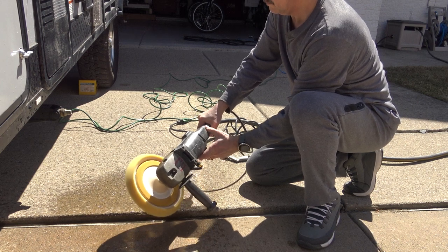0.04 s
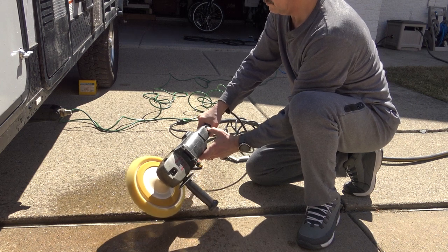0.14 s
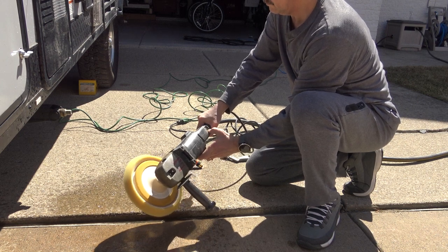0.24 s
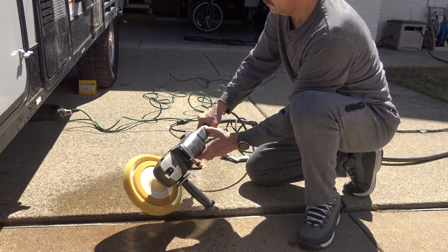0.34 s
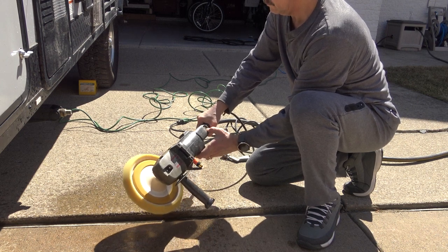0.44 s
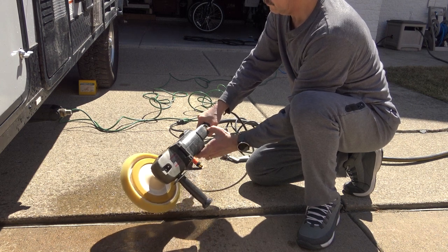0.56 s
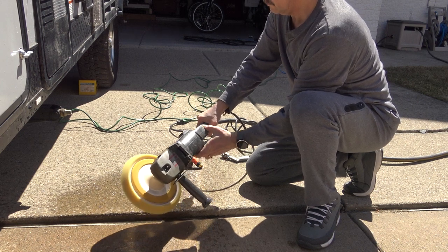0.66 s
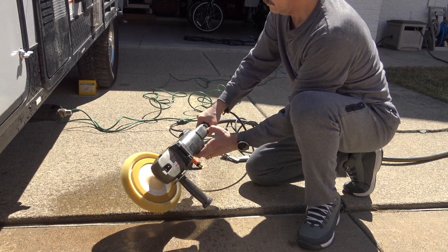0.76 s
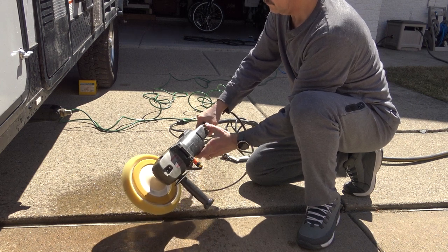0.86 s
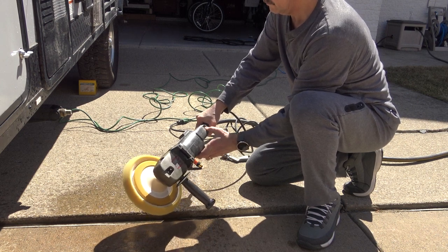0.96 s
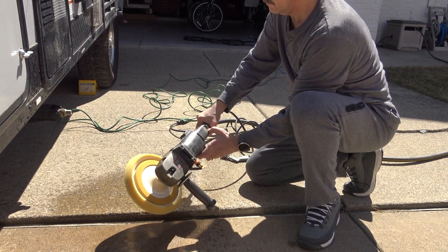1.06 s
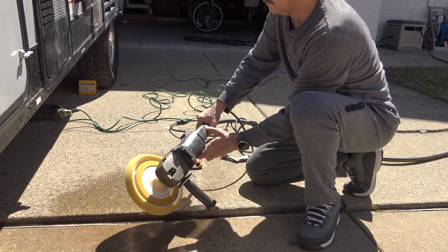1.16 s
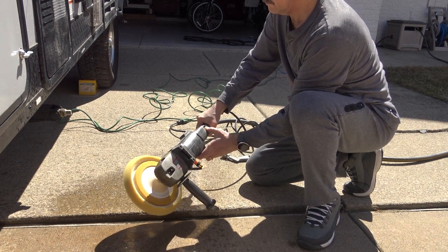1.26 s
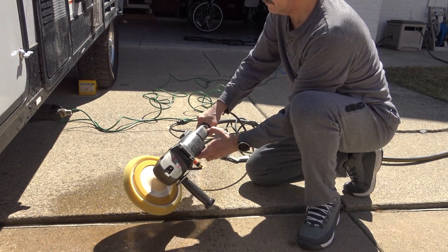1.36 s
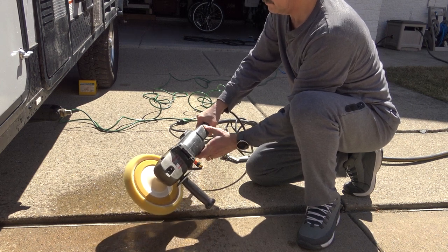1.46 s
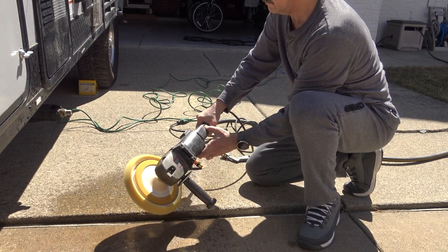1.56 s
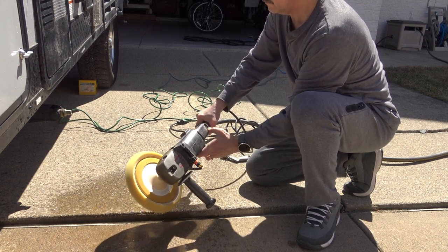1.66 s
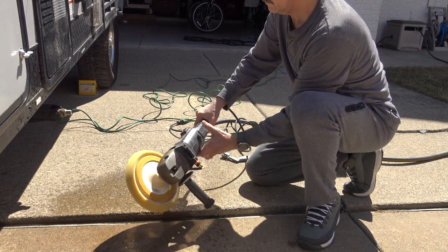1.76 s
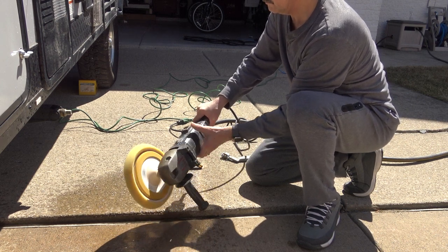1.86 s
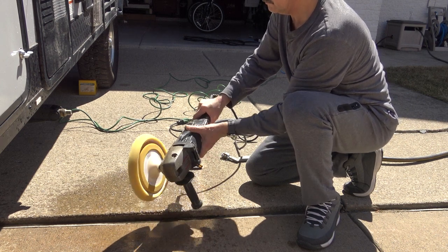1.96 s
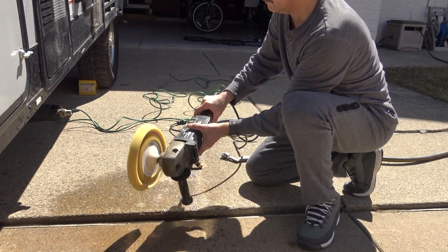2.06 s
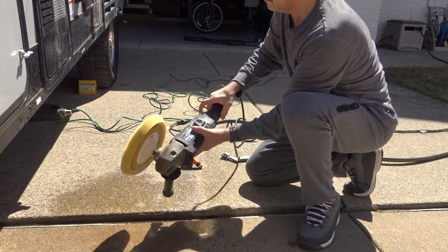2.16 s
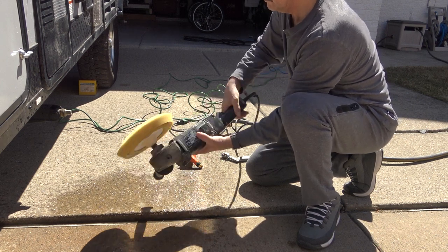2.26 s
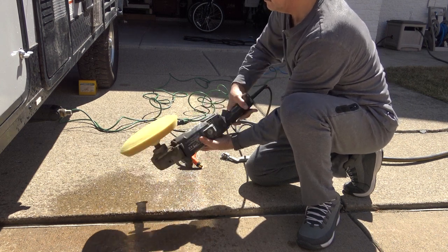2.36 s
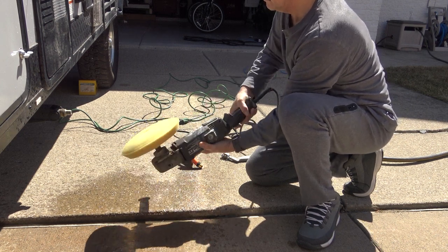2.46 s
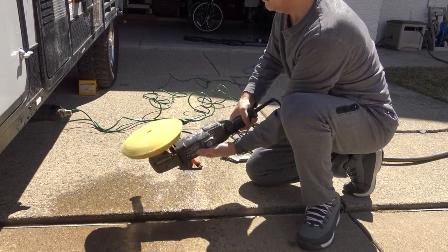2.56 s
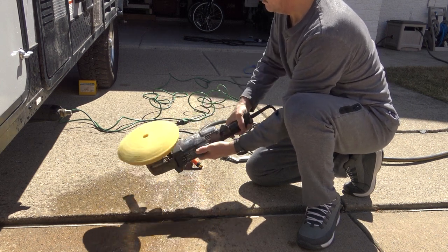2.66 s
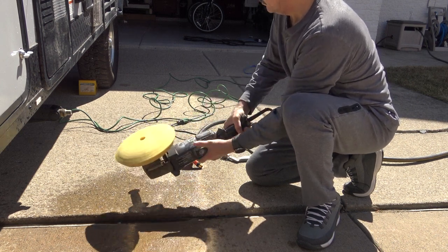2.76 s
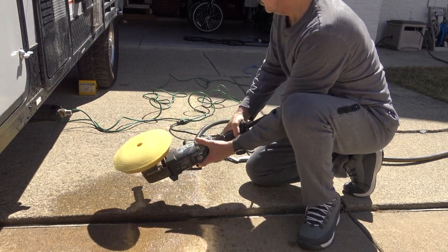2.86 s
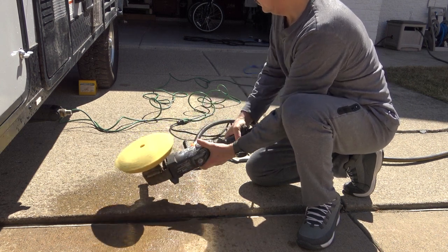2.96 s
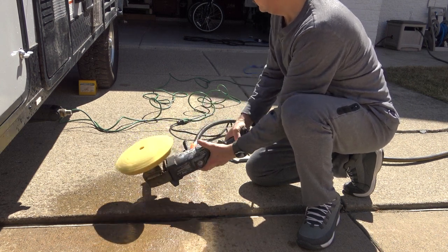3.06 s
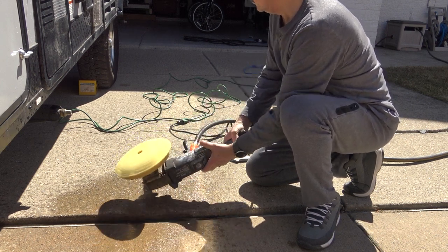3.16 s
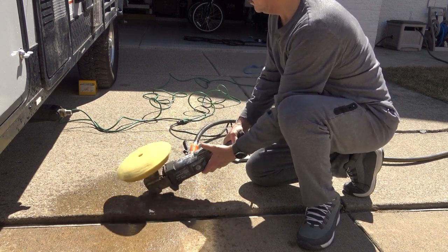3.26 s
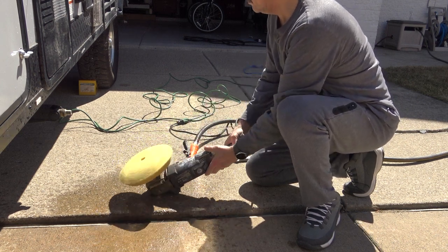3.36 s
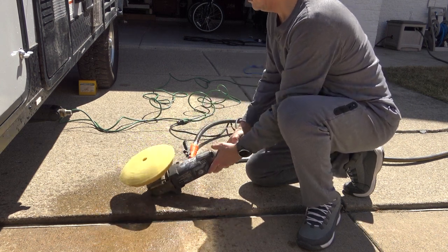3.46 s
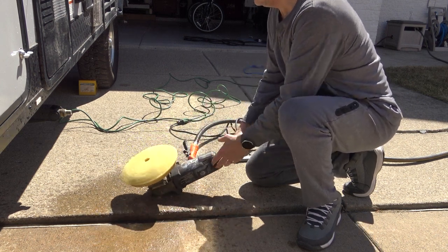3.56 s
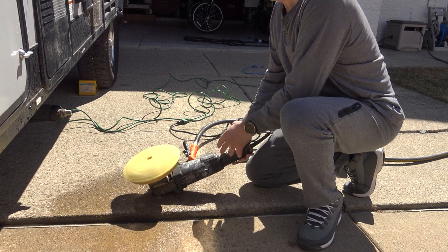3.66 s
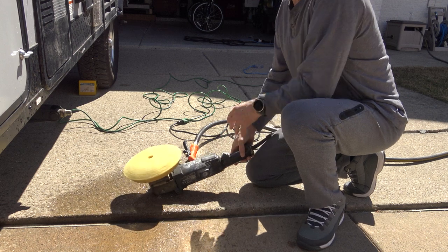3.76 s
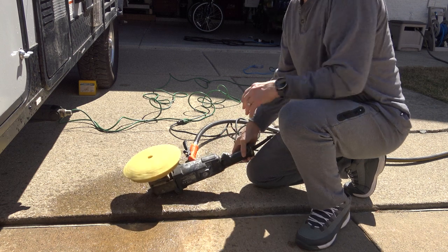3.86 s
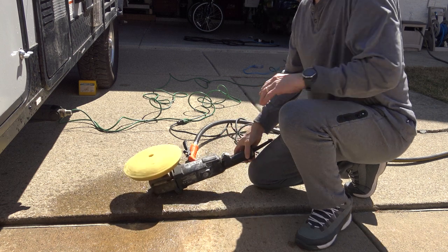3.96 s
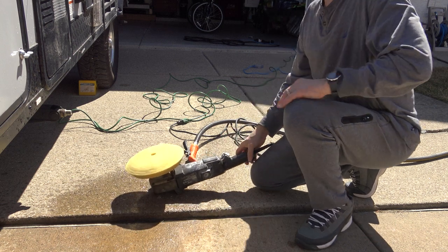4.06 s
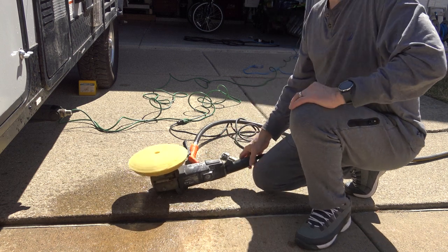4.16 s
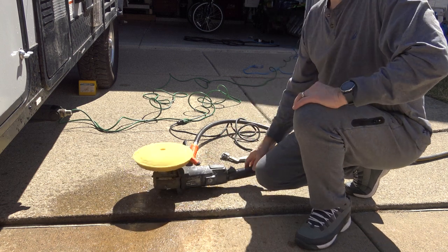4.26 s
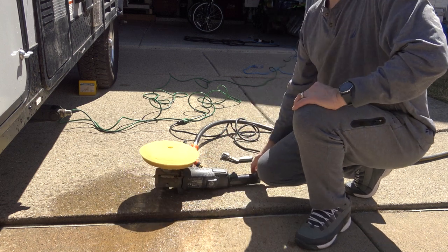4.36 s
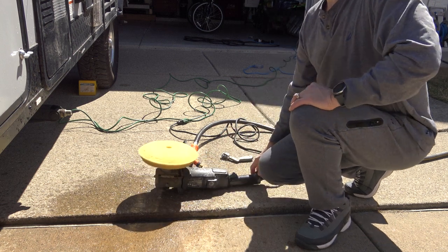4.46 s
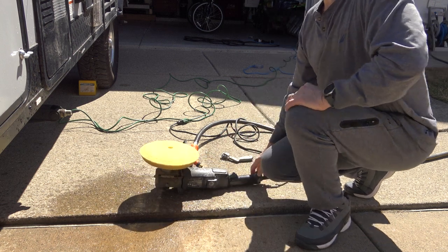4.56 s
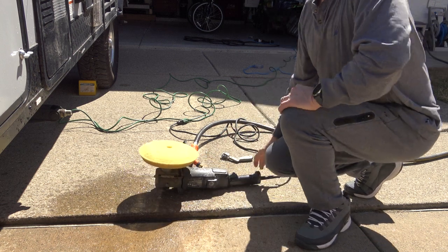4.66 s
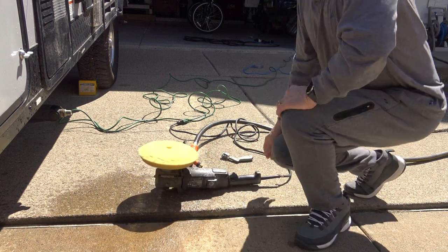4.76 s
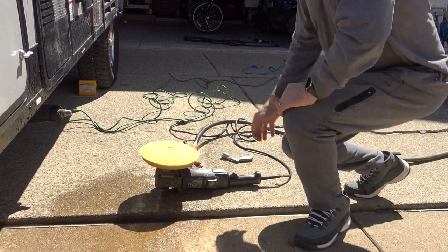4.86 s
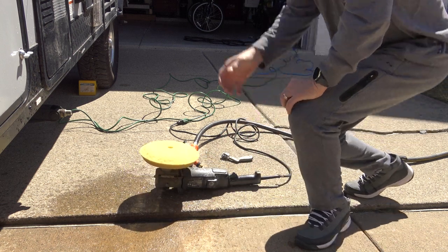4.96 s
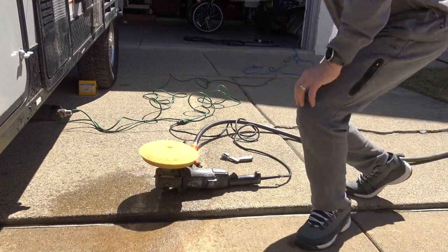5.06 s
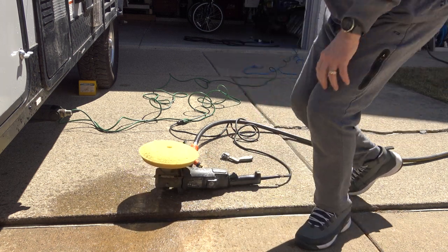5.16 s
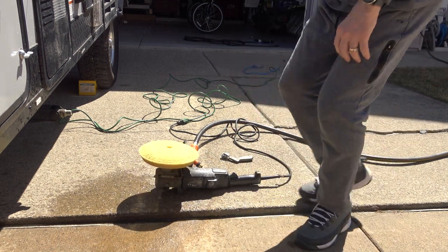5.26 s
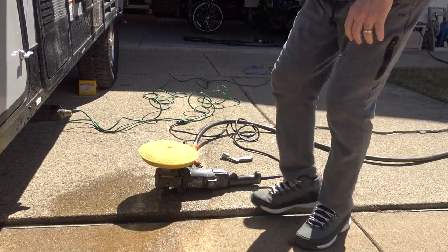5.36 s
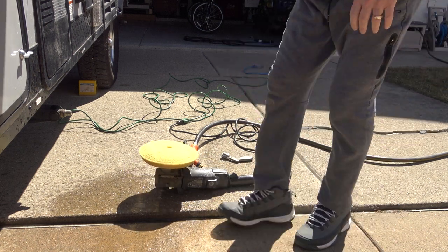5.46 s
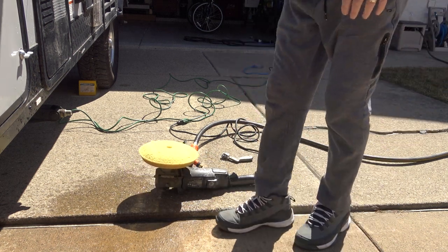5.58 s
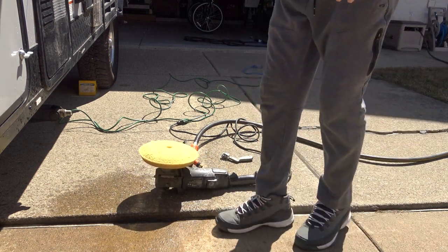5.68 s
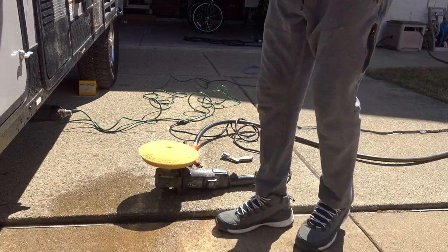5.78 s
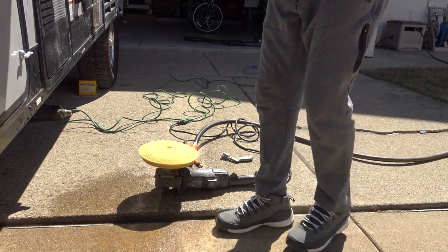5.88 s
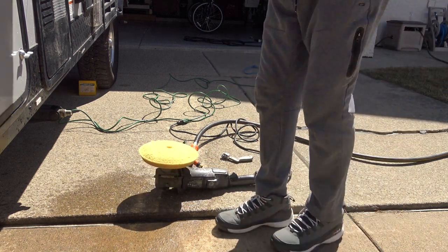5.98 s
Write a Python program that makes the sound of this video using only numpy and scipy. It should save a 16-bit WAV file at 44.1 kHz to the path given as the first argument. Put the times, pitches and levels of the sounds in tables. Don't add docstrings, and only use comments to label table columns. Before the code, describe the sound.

Outdoors on concrete, with a close stereo microphone, a rotary polisher is already spinning at full speed: a piercing, slightly fluttering whine near 4.6 kHz with higher overtones, rushing cooling air and quick gear knocks. At about 0.5 s it is switched off and the whine slides smoothly down, near 2.4 kHz by 2 s, while brush hiss shows through. From 1.2 s the knocks grow uneven, bright and metallic, about twenty to thirty a second with small pings, as the tool is turned over. Around 3.2-3.9 s it rattles, touching the concrete with a dull thud at 3.45 s as wind buffets softly. From 4 to 4.5 s the body chatters lower and woodier; sparse tooth clicks follow until 5.2 s as whirr and air die out. Quiet distant murmur and low wind remain. At 5.56 s a firm shoe thud lands, with gritty scuffs and lighter steps at 5.8 and 5.9 s.

```python
import sys
import numpy as np
from scipy import signal
from scipy.fft import rfft, irfft
from scipy.io import wavfile

SR = 44100
rng = np.random.default_rng(int(sys.argv[2]) if len(sys.argv) > 2 else 0)


def log_audio(samples):
    frames = np.atleast_2d(samples).T
    limited = np.clip(frames, -1, 1)
    pcm = np.round(limited * 32767).astype(np.int16)
    wavfile.write(sys.argv[1], SR, pcm)


def gain_from_db(level_db):
    decades = np.asarray(level_db, float) / 20
    return 10 ** decades


N = 265482
TIME = np.arange(N) / SR

# pitch_hz, level_db (per Hz)
YARD_SPECTRUM = [(100, -25.5), (200, -11.5), (500, -6.5), (900, -10), (1600, -18), (3000, -27),
                 (8000, -31.5), (15900, -38.5)]
# pitch_hz, level_db (per Hz)
WIND_SPECTRUM = [(15, -15.5), (40, -3.5), (110, -1.5), (200, -9), (400, -32), (900, -70)]
# peak_s, level_db, length_s
GUSTS = [(.65, -63, 0.18), (2.06, -44.5, 0.27), (2.622, -49, 0.18), (2.966, -48.5, 0.2),
         (3.436, -40.5, 0.21), (3.567, -33, 0.093), (3.78, -49, 0.079), (3.248, -50.5, 0.084),
         (3.91, -37.5, 0.12), (4.153, -40, 0.098), (4.276, -41, 0.18), (5.325, -44.5, 0.057)]
# start_s, peak_db, first_thud_hz, second_thud_hz, t60_s
SOLE_THUDS = [
    (5.559, -14, 284, 570, 0.03),
    (5.818, -21.5, 223, 525, 0.056),
    (5.93, -23.5, 274, 477, 0.06),
]
# start_s, peak_db, first_thud_hz, second_thud_hz, t60_s
SET_DOWN = [
    (3.452, -14.5, 318, 610, 0.017),
]
# start_s, peak_db, length_s
GRIT_SCUFFS = [(5.56, -36, 0.0053), (5.582, -36.5, 0.0089), (5.602, -44, 0.0057), (5.759, -37, 0.0052),
               (5.798, -32, 0.0074), (5.817, -25, 0.0057), (5.842, -36, 0.0058), (5.87, -37, 0.0063),
               (5.9, -27.5, 0.0073), (5.9244, -28.5, 0.0038)]
# peak_s, level_db, length_s, pitch_hz
SOLE_DRAGS = [
    (5.62, -52, 0.051, 2300),
    (5.873, -53, 0.0149, 2494),
]
# pitch_hz, level_db (per Hz)
AIR_SPECTRUM = [(88, -78), (150, -25.5), (375, -10), (920, -5), (1160, 0), (1360, -6.5), (2350, 4),
                (2970, -3), (7420, -3), (13900, -20), (15900, -28.5)]
# pitch_hz, level_db (per Hz)
HISS_SPECTRUM = [(120, -56.5), (200, -14.5), (682, -5), (1200, -3.5), (1770, -8.5), (2950, -10),
                 (9500, -19), (15900, -33)]
# pitch_hz, width_hz, level_db
CASING = [(660, 110, 3.0), (1450, 120, 7.0), (1750, 150, 6.0), (2450, 150, 6.0), (3950, 150, 2.0),
          (5100, 250, 3.0), (6400, 350, 3.0), (8900, 500, 4.0)]
# start_s, level_db, pitch_hz
GUARD_PINGS = [(1.854, -17, 8600), (1.926, -17, 7800), (2.216, -13.5, 5500), (5.825, -36, 5300),
               (5.828, -31, 1280), (2.725, -30, 7750), (2.725, -24, 8500), (2.822, -34, 7200),
               (2.857, -22, 7800), (2.934, -31, 7500), (2.998, -24.5, 7550), (3.073, -25, 8000),
               (3.149, -20.5, 5100), (3.149, -25, 8200), (3.191, -22.5, 5000), (3.289, -20.5, 7900),
               (3.434, -17.5, 8300), (3.434, -14, 5100), (3.593, -24.5, 5000), (4.06, -28.5, 7800),
               (4.092, -24.5, 7500), (4.13, -25.5, 7400), (4.178, -35, 7600), (4.214, -36.5, 7700),
               (4.322, -33.5, 8200), (4.416, -29.5, 8700)]
# start_s, level_db, pitch_hz
CLANKS = [(2.505, -16, 3190), (2.575, -14, 2300), (2.75, -19, 3300), (2.8, -17, 2600), (2.823, -14, 2600),
          (2.822, -20, 3280), (2.857, -27, 2700), (2.882, -17.5, 2600), (2.951, -23, 2730),
          (2.998, -16, 3110), (3.02, -15, 2300), (3.02, -18, 3810), (3.073, -18, 2930), (3.094, -25, 2980),
          (3.094, -19, 3800), (3.149, -15, 3220), (3.149, -18, 3890), (3.191, -18, 3370),
          (3.289, -16, 3320), (3.289, -22, 3880), (3.485, -24, 3200), (3.537, -18, 2798),
          (4.016, -11, 1770), (4.08, -16, 2670), (4.13, -20, 1860), (4.214, -15, 2670), (4.214, -21, 1850),
          (4.322, -23, 2700), (4.366, -20, 2700), (4.718, -25, 1047), (4.953, -29, 1053),
          (2.455, -16, 3900), (5.932, -39, 1300)]
# pitch_hz, level_db, t60_s
HOUSING = [(404, -14, 0.14), (660, -3.5, 0.031), (854, 5.5, 0.011), (1027, -10.5, 0.12),
           (1332, -1.5, 0.036), (1667, -10.5, 0.064), (1860, 7.5, 0.013), (2300, 0.5, 0.012),
           (2630, -1.5, 0.06), (2910, -1, 0.0096), (3224, -7.5, 0.049), (3800, -6, 0.017),
           (5130, -5, 0.013), (7150, -8.5, 0.0108)]
# time_s, level_db, place (0-1 turn), swing early/late (0-1 turn)
HIGH_SPOT = [(0.0, -10, 0.89, 0), (.55, -12, 0.72, 0.05), (.9, -14, 0.74, 0), (1.15, -15.5, 0.63, 0.03),
             (1.4, -11, 0.74, 0.08), (1.75, -14.5, 0.73, 0)]
# start_s, level_db, loudest_ring_hz
UNSEATING = [(1.203, -14, 1800), (1.235, -16.5, 1650), (1.274, -16.5, 1600), (1.291, -8, 1912),
             (1.301, -9.5, 2340), (1.340, -8, 1860), (1.360, -15, 2590), (1.373, -7.5, 2610),
             (1.391, -19, 2100), (1.414, -13, 1440), (1.431, -14, 1980), (1.447, -14.5, 1356),
             (1.492, -15.5, 1460), (1.509, -11.5, 2490), (1.524, -14, 1400)]
# start_s, level_db, loudest_ring_hz
SLIPPING = [(1.567, -7.5, 1927), (1.602, -8, 2627), (1.645, -8, 2600), (1.684, -3.5, 2582),
            (1.734, -4.5, 2600), (1.766, -5.5, 2600), (1.817, -9.5, 2500), (1.854, -7, 2425),
            (1.903, -6, 2430), (1.942, -9, 2440), (1.992, -7.5, 2480), (2.040, -8, 2320), (2.087, -6, 2600),
            (2.135, -8, 2223), (2.188, -6.5, 2195), (2.232, -5, 2130), (2.290, -8, 2600), (2.338, -5, 2050),
            (2.395, -9, 2980), (2.455, -7.5, 3020), (2.505, -11, 3047), (2.575, -9, 3200),
            (2.628, -11, 3230), (2.706, -13.5, 2600), (2.769, -13.5, 2707), (2.822, -10.5, 1728),
            (2.882, -7, 1700), (2.950, -8, 1650), (3.020, -11, 1589), (3.094, -9.5, 1600),
            (3.171, -10, 3425)]
# start_s, level_db, loudest_ring_hz
REBOUNDS = [(1.585, -10, 2624), (1.632, -12.5, 1884), (2.073, -11.5, 2447), (2.411, -11, 3198),
            (2.555, -19.5, 902), (2.8, -19.5, 1830), (2.856, -17.5, 3116), (1.667, -13, 2588),
            (1.751, -9.5, 2600), (1.84, -6.5, 2392), (1.877, -12, 2400), (1.926, -9, 2588),
            (2.013, -13.5, 2498), (2.216, -13.5, 3224), (2.27, -11, 3183), (2.433, -16, 3996),
            (2.485, -6, 1821), (2.532, -17, 3190), (2.723, -12, 1680), (2.749, -11, 2610),
            (2.933, -15.5, 3180), (2.998, -11.5, 1505), (3.073, -17.5, 636), (3.149, -11, 1861),
            (3.191, -15, 3074)]
# start_s, level_db, loudest_ring_hz
RATTLE = [(3.247, -16, 3410), (3.265, -13.5, 3360), (3.289, -10.5, 1817), (3.341, -13, 1739),
          (3.404, -10.5, 2470), (3.424, -6, 2720), (3.434, -7, 2900), (3.459, -8.5, 724),
          (3.484, -11.5, 2685), (3.537, -11.5, 2272), (3.572, -15.5, 960), (3.593, -13.5, 2245),
          (3.62, -14.5, 978), (3.674, -13.5, 2650), (3.717, -15.5, 1076), (3.736, -11, 2661),
          (3.805, -14.5, 890), (3.822, -6.5, 955), (3.833, -8.5, 1830), (3.863, -13.5, 966),
          (3.89, -8.5, 966), (3.916, -25.5, 963)]
# start_s, level_db, loudest_ring_hz
CHATTER = [(4.016, -9.5, 888.4), (4.04, -14, 931), (4.06, -11, 854), (4.08, -11, 920), (4.092, -10, 865),
           (4.113, -12, 952), (4.13, -10.5, 763), (4.158, -12.5, 1127), (4.178, -9, 1795),
           (4.201, -14, 787), (4.214, -14.5, 797), (4.24, -11, 989), (4.257, -15, 701), (4.292, -17, 982),
           (4.322, -10.5, 1845), (4.348, -9.5, 979), (4.368, -16, 1837), (4.416, -7.5, 1924),
           (4.437, -14, 1515), (4.388, -16.5, 1002), (4.467, -14.5, 606), (4.501, -16, 1702),
           (4.539, -17.5, 1745)]
# start_s, level_db, loudest_ring_hz
LAST_TEETH = [(4.669, -19.5, 1798), (4.718, -19.5, 1797), (4.732, -18, 1856), (4.771, -20.5, 1794),
              (4.833, -19.5, 704), (4.909, -20.5, 641.7), (4.987, -20, 653.2), (5.034, -22, 660),
              (5.072, -17, 653), (5.124, -32, 1530), (5.18, -29.5, 660), (5.212, -35.5, 1227)]
# time_s, blade_rate_hz
ROTOR = [(0.0, 4633), (0.12, 4652), (0.31, 4653), (0.48, 4579), (0.55, 4447), (0.74, 4041), (1.02, 3542),
         (1.25, 3200), (1.59, 2771), (1.99, 2363), (2.34, 2051), (2.61, 1817), (3.1, 1443), (3.45, 1208),
         (3.78, 992), (4.13, 772), (4.45, 571), (5.1, 192)]
ORDERS = (1 / 12, 1 / 6, 1, 2, 2.5, 3, 3.5)
# full_speed_db, loss_db (per octave slower), whirl_db (gain at critical speed)
ORDER_LEVELS = [(-47.5, -3, .1), (-39.5, 5, .1), (-30, 4, -4.5), (-27.5, 10, -3.5), (-51.5, 0.7, 9),
                (-45.5, -1.5, -12.5), (-62, -1.8, 0.5)]
WEAK_ORDERS = (1.5, 4, 5, 6, 8)
# full_speed_db, gain_db (per octave slower)
WEAK_LEVELS = [(-4, -7), (-17.5, 3), (-25, 5), (-30.5, 5.5), (-20.5, 6)]
# pitch_hz, width_hz, upright_db, turned_over_db
SHROUD = [(696, 150, 0, 9), (1628, 180, -8, 16), (2075, 120, -1.5, 7.5), (2290, 94, 1.5, 5),
          (2480, 90, -14, 7), (2984, 26, -7.5, 7), (3487, 246, 10, 5), (3960, 210, 3.5, 12),
          (4560, 140, 8.5, 9.5), (5530, 390, 6, 13.5), (6140, 360, 2, 11.5), (7200, 780, 10, 13.5),
          (7900, 360, -4, -2), (9400, 1040, 9, 8)]
# order, peak_s, length_s, level_db
BEAMS = [(1, 2.241, 0.13, 4.5), (1, 1.7, 0.2, -15.5), (1, 3.528, 0.18, 6), (1, 4.684, 0.22, -4.5),
         (1, 0.31, 0.088, 1), (4, 3.1, 0.1, -1), (8, 3.2, 0.19, 3), (8, 2.1, .2, 7), (6, 1.6, .15, 7),
         (1.5, 1.2, 0.17, -0.5), (1.5, 4.9, .1, -7), (1.5, 4.9, 0.091, 6), (1.5, 3.75, 0.38, -20),
         (2, 0.39, 0.35, -3), (2, 0.8, 0.17, 5.5), (2, 1.95, 0.16, -1), (2, 2.44, 0.082, -5),
         (2, 3.2, 0.088, -3), (2, 3.72, 0.11, 8.5), (2, 4.256, 0.12, 14), (2, 4.4, 0.078, 14),
         (2, 2.086, 0.13, -7), (3, 3.76, 0.0525, 8.5), (3, 2.404, 0.068, 5), (2.5, 2, 0.2, 0),
         (2.5, 3.367, 0.14, -14), (3, 1.927, 0.1, 1), (3, 3.31, 0.19, -7), (3, 5.1, 0.071, 16),
         (3, 4.52, 0.1, 0), (3.5, 2.78, 0.1995, 5.5), (3.5, 2.8, .1, -2), (3.5, 4.7, 0.17, 8),
         (4, .9, .1, 14), (4, 1.6, .4, 5), (4, 3.06, 0.12, 10), (4, 2.1, 0.073, 6), (4, 4.15, 0.12, 1),
         (4, 4.42, 0.087, 10.5), (4, 6.8, 0.085, 2), (5, 1.7, .2, 9), (5, 2.1, .1, 8), (5, 2.9, .1, -1),
         (5, 4.6, 0.092, 6), (6, 4.3, 0.28, 3), (6, 2.3, .1, 8), (6, 2.775, .15, 7), (6, 4.3, 0.1, 4),
         (3, 2.08, .05, -2.5), (3, 1.2, 0.148, 1.5), (2, 1.64, .08, 1), (2, 1.3, 0.085, 1),
          (2, 1.46, .05, -6.5), (8, 3.8, 0.31, -8), (2.5, 2.4, .12, -6), (2.5, 2.93, 0.079, 0.5),
          (4, 4.75, .1, 3), (2, 3, 0.12, 0), (1, 4.6, 0.043, -4), (3, 4.9, .05, -8), (8, 4.93, .08, -5),
          (3, 2.34, .07, -9), (3, 2.7, 0.13, 0), (2.5, 3.15, 0.073, -5), (1, 1.55, .08, 6),
          (8, 4.6, .12, -3), (3.5, 2.9, 0.045, 5), (3.5, 2.62, 0.055, 4), (3.5, 2.1, 0.06006, -3),
          (1, 1.6, .04, 2), (3, 2.52, 0.035, 2), (5, 5.9, .12, 14), (6, 4, 0.13, 9)]
# pitch_hz, left_minus_right_db
PORT_LEAN = [(60, -1), (150, -3), (380, 3), (950, 1), (2380, 1.5), (5980, 2), (15000, 1.5)]

MIC_TOP_HZ = 15900
SWITCH_OFF_S = 0.55


def rms_one(x):
    return x / np.sqrt(np.mean(x ** 2) + 1e-20)


def white():
    return rng.standard_normal(N)


def butter(x, order, hz, kind):
    return signal.sosfilt(signal.butter(order, hz, kind, fs=SR, output="sos"), x)


def in_time(rows):
    s, *columns = np.transpose(rows)
    return [np.interp(TIME, s, c) for c in columns]


def at_hz(points, hz):
    points_hz, points_db = np.array(points).T
    return np.interp(np.log(hz), np.log(points_hz), points_db)


def shape(x, points, share=1):
    hz = np.maximum(np.arange(N // 2 + 1) * SR / N, 1)
    return irfft(rfft(x) * gain_from_db(share * at_hz(points, hz)), N)


def drift(rate):
    r = np.exp(-80 * np.pi * rate / SR)
    slow = signal.lfilter([1], [1, -2 * r, r * r], rng.standard_normal(N // 40 + 2002))[2000:]
    return np.interp(np.arange(N) / 40, np.arange(len(slow)), rms_one(slow))


def ring(clicks, hz, t60):
    r, w = gain_from_db(-60 / (t60 * SR)), 2 * np.pi * hz / SR
    return signal.lfilter([0, np.sin(w)], [1, -2 * r * np.cos(w), r * r], clicks + 1e-18)


def bursts(times, gains, length):
    marks = np.zeros(N)
    marks[(np.array(times) * SR).astype(int)] = gains
    reach = np.arange(-400, 900) / SR / length
    bump = np.where(reach < 0, np.exp(-2.5 * reach ** 2), np.exp(-np.abs(reach) ** 1.2))
    return signal.fftconvolve(marks, bump)[400:N + 400]


def octaves_down(blade_hz):
    return np.log2(4650 / blade_hz)


def turned_over():
    middle_s, lasts_s = 1.83, 0.3
    return np.clip((TIME - middle_s) / lasts_s + 0.5, 0, 1)


def yard():
    noise = white() + 0.094 * rng.standard_normal((2, N))
    return rms_one(shape(noise, YARD_SPECTRUM)) * gain_from_db(-49.5)


def wind():
    force = gain_from_db(-62.5 + 2.5 * TIME)
    for s, db, length in GUSTS:
        side = np.where(TIME < s, 0.33 * length, length)
        force = force + gain_from_db(db) * np.exp(-((TIME - s) / side) ** 2)
    return rms_one(shape(white(), WIND_SPECTRUM)) * force * gain_from_db(2.8 * drift(6.6))


def outdoors(x):
    dull = signal.lfilter([0.4], [1, -0.6], x)
    lags = (rng.uniform(0.003, 0.045, (2, 6)) * SR).astype(int)
    return np.array([sum(np.pad(dull, (lag, 0))[:N] * (-1) ** lag for lag in side) for side in lags])


def steps():
    out = np.zeros(N)
    for s, db, low_hz, high_hz, t60 in SOLE_THUDS + SET_DOWN:
        push = bursts([s + 0.00208], [gain_from_db(db - 22.0)], length=0.0002)
        out += ring(push, low_hz, t60) - 0.54 * ring(push, high_hz, 0.71 * t60)
        out += 0.062 * ring(push, 1280, 0.9 * t60) + 0.24 * ring(push, 3300, 0.16 * t60)
        out -= 0.3 * ring(push, 770, 0.43 * t60)
    out = butter(out, 2, 190, "high")
    grit = butter(white() * gain_from_db(6.0 * drift(360)), 2, [1500, 9500], "band")
    for s, db, length in GRIT_SCUFFS:
        out += grit * bursts([s + 0.0066], [gain_from_db(db - 12.5)], length)
    for s, db, length, hz in SOLE_DRAGS:
        out += rms_one(ring(white(), hz, 0.0022)) * gain_from_db(db) * np.exp(-((TIME - s) / length) ** 2)
    return out


def vent(blade_hz):
    centre_hz, width_hz, loss_db_per_octave = 10890, 820, 24
    breath = butter(white(), 2, [centre_hz - width_hz / 2, centre_hz + width_hz / 2], "band")
    return rms_one(breath) * gain_from_db(-33 - loss_db_per_octave * octaves_down(blade_hz) + 2.5 * drift(9))


def casing(noise, gain):
    out = noise.copy()
    for hz, width, db in CASING:
        r = np.exp(-np.pi * width / SR)
        poles = [1, -2 * r * np.cos(2 * np.pi * hz / SR), r * r]
        out += gain * gain_from_db(db) * signal.lfilter([(1 - r * r) / 2, 0, (r * r - 1) / 2], poles, noise)
    return rms_one(out)


def rush(air_db, hiss_db):
    stop_s, die_db_per_s = 5.03, 79
    air = casing(shape(white(), AIR_SPECTRUM), gain=0.0097) * gain_from_db(air_db + 1.5 + 1.6 * drift(40))
    hiss = casing(shape(white(), HISS_SPECTRUM), gain=0.8)
    hiss = hiss * gain_from_db(hiss_db - 4.5 + 1.2 * drift(25) + 1.2 * drift(4))
    return (air + hiss) * gain_from_db(-die_db_per_s * np.maximum(TIME - stop_s, 0))


def thin(noise, blade_hz):
    roar_hz, roar_needs_hz = 1060, 710
    fizz_hz, fizz_needs_hz = 5000, 886
    low = signal.sosfiltfilt(signal.butter(2, roar_hz, fs=SR, output="sos"), noise)
    top = signal.sosfiltfilt(signal.butter(2, fizz_hz, "high", fs=SR, output="sos"), noise)
    roar_lost = np.clip(1 - blade_hz / roar_needs_hz, 0, 1) ** 0.52
    fizz_lost = np.clip(0.69 * (1 - blade_hz / fizz_needs_hz), 0, 0.9)
    return noise - low * roar_lost - top * fizz_lost


def pings():
    out, decay_s = np.zeros(N), 0.0029
    for s, db, hz in GUARD_PINGS + CLANKS:
        i = int(s * SR) + np.arange(-200, 800)
        t = i / SR - s
        fade = np.exp(-np.where(t < 0, 7.3 * (t / decay_s) ** 2, t / decay_s))
        out[i] += gain_from_db(db) * np.sin(2 * np.pi * hz * t) * fade
    return out


def seated_knocks(cycles, blade_hz):
    blades_per_turn, seated_until_s = 110, 1.18
    housing_hz, coast_ring_s = 2600, 0.88
    turn = np.arange(int(np.interp(seated_until_s, TIME, cycles) / blades_per_turn - 0.6) + 1)
    when = np.interp((turn + 0.7) * blades_per_turn, cycles, TIME)
    chance = rng.standard_normal((len(turn), 2))
    db, place, swing = [np.interp(when, TIME, c) for c in in_time(HIGH_SPOT)]
    place = turn + place - swing * (-1) ** turn + 0.015 * chance[:, 0]
    s = np.interp(place * blades_per_turn, cycles, TIME)
    rate = np.interp(s, TIME, blade_hz)
    slack = (turn % 2 == 1) & (s > SWITCH_OFF_S) & (s < coast_ring_s)
    ring_hz = np.where((rate > 3300) & ~slack, rate / 2, np.minimum(rate, housing_hz))
    seated = np.transpose([s, db + 1.5 + 1.5 * chance[:, 1], ring_hz])
    between = seated[:-1] + np.outer(np.diff(s), [0.45, 0, 0]) + [0, 1, 0]
    between[:, 2] = housing_hz
    return np.vstack([seated, between[s[:-1] > SWITCH_OFF_S]])


def knocks(cycles, blade_hz):
    seated = seated_knocks(cycles, blade_hz)
    rows = np.vstack([seated, UNSEATING, SLIPPING, REBOUNDS, RATTLE, CHATTER, LAST_TEETH])
    s, db, ring_hz = rows[np.argsort(rows[:, 0])].T
    bright = 20.5 + 8 * (s < SWITCH_OFF_S)
    bright = bright - 5.5 * octaves_down(np.interp(s, TIME, blade_hz)) + 4.5 * np.log2(ring_hz / 2000)
    return s, db, bright + 6.1 * rng.standard_normal(len(s)), ring_hz


def gears(cycles, blade_hz):
    s, db, bright, ring_hz = knocks(cycles, blade_hz)
    mesh_hz = blade_hz[(s * SR).astype(int)] / 2
    on_mesh = np.abs(np.log(ring_hz / mesh_hz)) < 0.12
    slips = np.isin(s, np.array(SLIPPING)[:, 0])
    bite_db = np.where(on_mesh, 2.5, -5.0 - 0.5 * slips) - np.clip(900 - mesh_hz, 0, 500) / 30
    out = np.sin(np.pi * cycles) * bursts(s, gain_from_db(db + bite_db), length=0.0026)

    pure_db = 3.5 * np.exp(-((s - 1.85) / 0.17) ** 2)
    nearest = np.searchsorted((s[1:] + s[:-1]) / 2, TIME)
    loudest = np.sin(2 * np.pi * np.cumsum(ring_hz[nearest]) / SR)
    out += loudest * bursts(s, ~on_mesh * gain_from_db(db - 5.0 + pure_db), length=0.0038)

    overtones = np.sin(3 * np.pi * cycles + drift(37)) + 0.5 * np.sin(5 * np.pi * cycles + drift(37))
    out += overtones * bursts(s, gain_from_db(db - 16.5), length=0.0047)

    crack = butter(white(), 2, [900, 6000], "band")
    crack_db = -8 - 0.35 * np.clip(bright - 9.0, 0, 12.0) + 0.66 * np.clip(bright - 3.0, -20.0, 0)
    out += crack * bursts(s, gain_from_db(db + crack_db), length=0.0048)

    each = (len(s), len(HOUSING))
    spread, signs = rng.normal(0, 2.0, each), rng.choice([-1, 1], each)
    late = rng.uniform(0, 0.002044, each)
    smooth_db = 1.3 * np.clip(bright - 9.0, 0, 12.0) + 1.2 * pure_db
    for k, (hz, level_db, t60) in enumerate(HOUSING):
        tilt = 0.37 * np.clip(bright - 2.5, -22.0, 8.0) * np.tanh(3 * np.log(hz / 1400))
        click_db = db + level_db + tilt + spread[:, k] + 1.5 - smooth_db
        clicks = np.zeros(N)
        clicks[((s - 0.0018 + late[:, k]) * SR).astype(int)] = signs[:, k] * gain_from_db(click_db)
        soft_rise = ring(clicks, hz, 0.0019) * 1700 / SR
        out += ring(soft_rise, hz, t60)
    return butter(out, 4, 330, "high")


def flare_db(hz):
    return sum((db + 4.0) / (1 + ((hz - centre) / width) ** 2) for centre, width, db in CASING)


def beam_db(order):
    coarse = TIME[::100]
    total = 0 * coarse
    for k, s, length, db in BEAMS:
        if abs(k - order) < 0.2:
            total = total + db * np.exp(-((coarse - s) / length) ** 2)
    return np.interp(TIME, coarse, total)


def tone_levels(blade_hz):
    coarse, rate, over = TIME[::100], blade_hz[::100], turned_over()[::100]
    whirl = np.exp(-((rate - 1650) / 445) ** 2)
    levels = []
    for order, (full_db, loss_db, whirl_db) in zip(ORDERS, ORDER_LEVELS):
        db = full_db - loss_db * octaves_down(rate) + whirl_db * whirl
        for hz, width, up, down in SHROUD:
            db = db + (up + over * (down - up)) / (1 + ((order * rate - hz) / width) ** 2)
        levels.append(np.interp(TIME, coarse, db))
    return levels


def whine(cycles, blade_hz, levels_db, hiss_db):
    tones = list(zip(ORDERS, levels_db))
    for order, (db, gain_db) in zip(WEAK_ORDERS, WEAK_LEVELS):
        hz = order * blade_hz
        colour_db = at_hz(HISS_SPECTRUM, np.maximum(hz, 800)) + flare_db(hz)
        tones.append((order, hiss_db + db + colour_db + 1.2 * drift(8.2) + gain_db * octaves_down(blade_hz)))
    out = np.zeros(N)
    cycles = cycles + 0.13 * drift(7.4)
    hush_db = 9.0 * np.clip(np.log2(1000 / blade_hz), 0, 3)
    for order, db in tones:
        hz, lowest_hz = order * blade_hz, 170 if order < 0.1 else 380
        audible = np.clip((MIC_TOP_HZ - hz) / 500, 0, 1) * np.clip((hz / lowest_hz - 1) * 3.1, 0, 1)
        flutter_db = 2.4 * drift(81) + 1.8 * (order > 1) * drift(8.4)
        level = gain_from_db(db + beam_db(order) - (order > 1) * hush_db + 3.5 + flutter_db)
        out += audible * level * np.sin(2 * np.pi * order * cycles + 0.5 * drift(24))
    return out * np.clip((blade_hz - 200) / 60, 0, 1)


def scene():
    blade_hz, = in_time(ROTOR)
    cycles = np.cumsum(blade_hz) / SR
    slower = octaves_down(blade_hz)
    shade_db = -3 * turned_over()
    air_db = -18.0 - 3 * slower - 1.1 * slower ** 2
    load_hush_db = 21.5 * np.clip(1 - TIME / 0.82, 0, 1)
    hiss_db = -20 - 2 * slower - load_hush_db
    near = steps() + vent(blade_hz)
    near += thin(rush(air_db + shade_db, hiss_db + 0.18 * shade_db), blade_hz)
    near += pings() + gears(cycles, blade_hz)
    near += whine(cycles, blade_hz, tone_levels(blade_hz), hiss_db)
    return yard() + wind() + gain_from_db(-25.0) * outdoors(near) + near


def band_limit(x):
    return signal.sosfilt(signal.butter(12, 16030, fs=SR, output="sos"), x)


def record(dry):
    ports = np.array([shape(dry[0], PORT_LEAN, share=0.94), shape(dry[1], PORT_LEAN, share=-0.5)])
    rounded = 0.83 * np.tanh(ports / 0.96)
    edge = signal.cheby2(24, 60, MIC_TOP_HZ + 150, fs=SR, output="sos")
    return band_limit(signal.sosfilt(edge, rounded))


dry = scene()
out = record(dry)
log_audio(out)
```